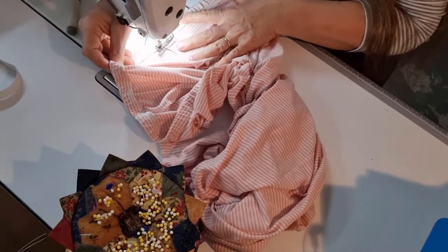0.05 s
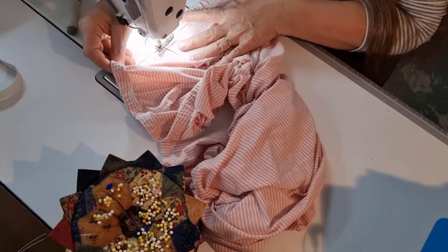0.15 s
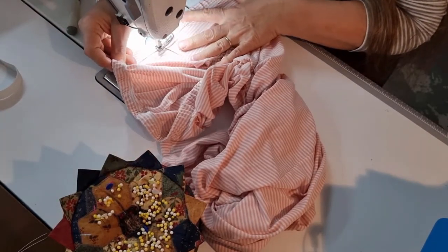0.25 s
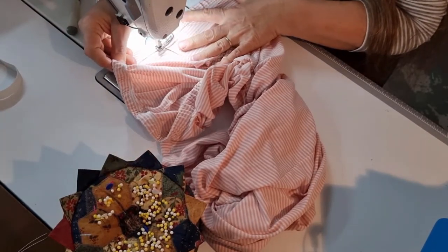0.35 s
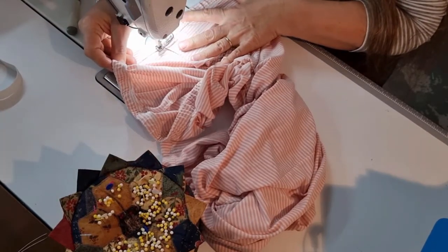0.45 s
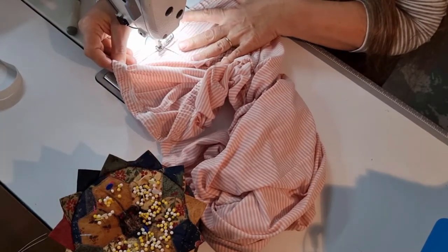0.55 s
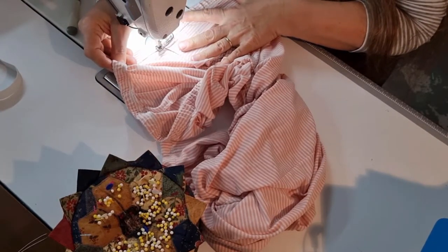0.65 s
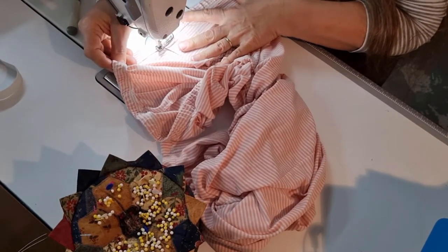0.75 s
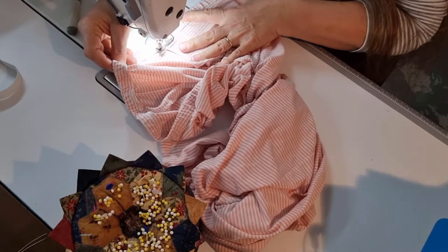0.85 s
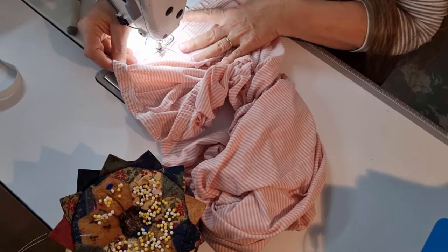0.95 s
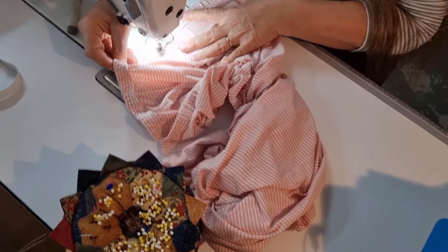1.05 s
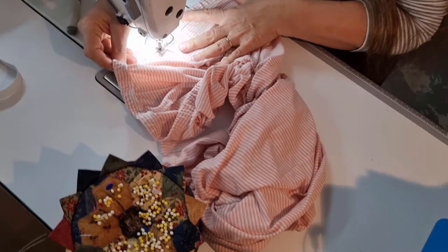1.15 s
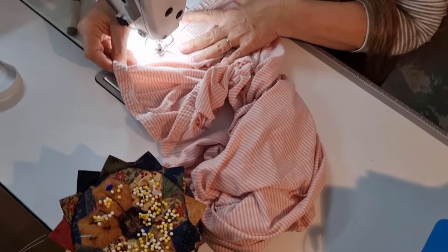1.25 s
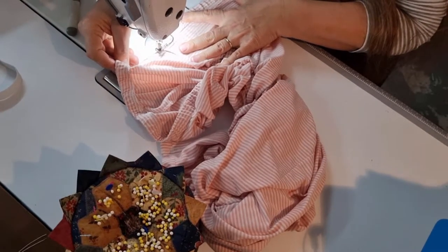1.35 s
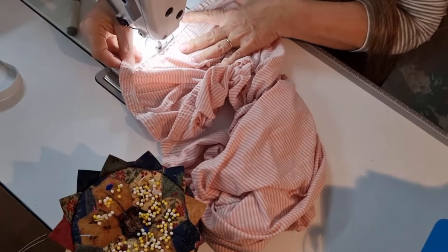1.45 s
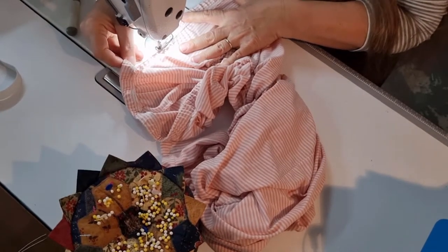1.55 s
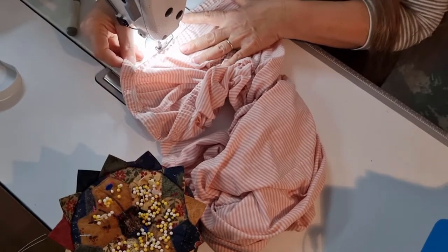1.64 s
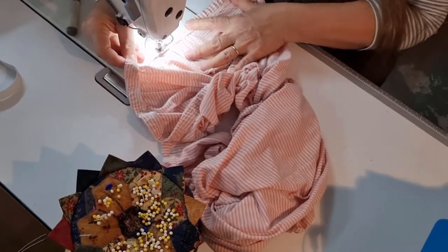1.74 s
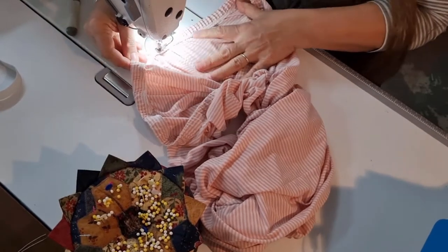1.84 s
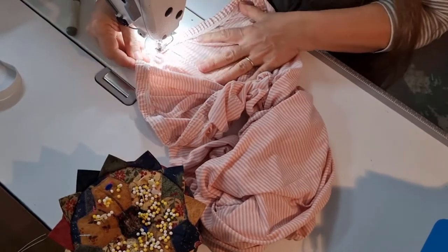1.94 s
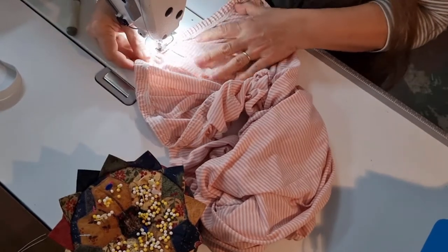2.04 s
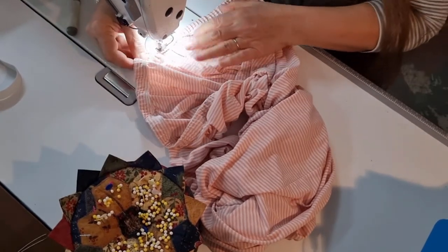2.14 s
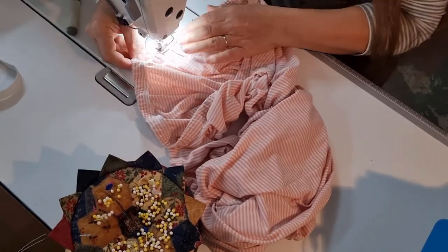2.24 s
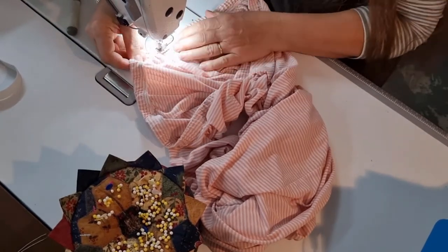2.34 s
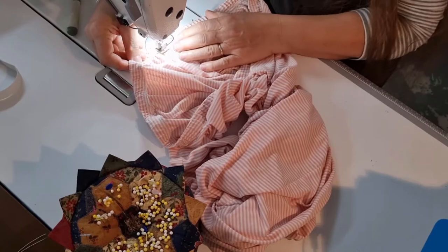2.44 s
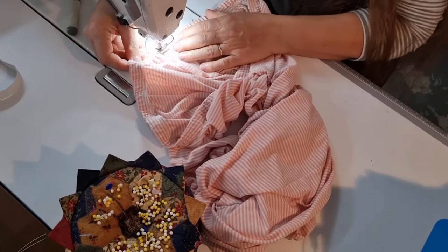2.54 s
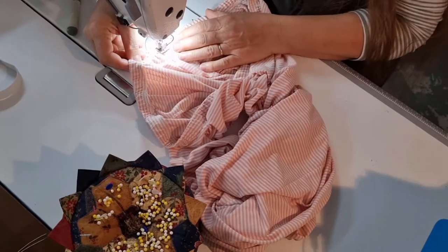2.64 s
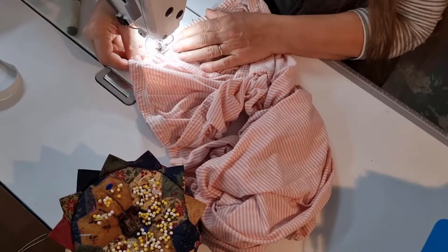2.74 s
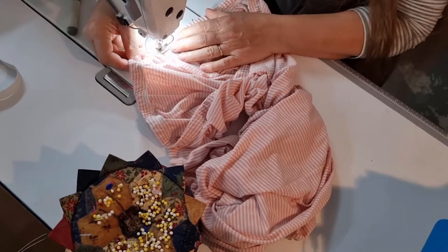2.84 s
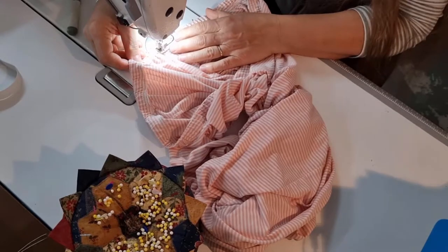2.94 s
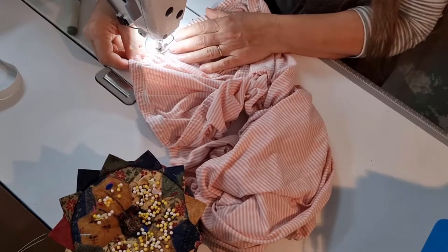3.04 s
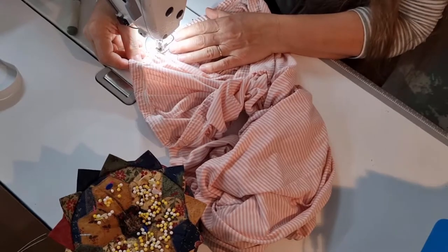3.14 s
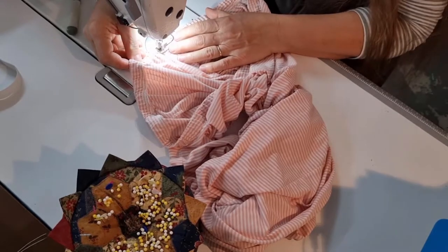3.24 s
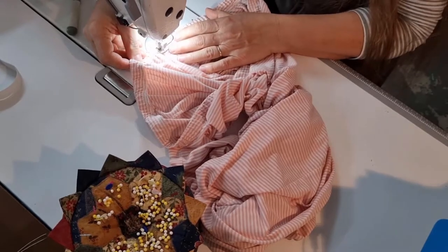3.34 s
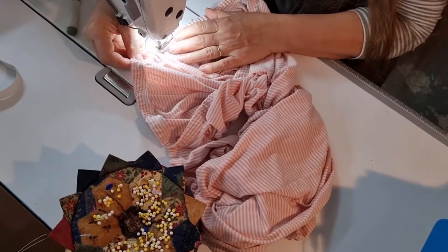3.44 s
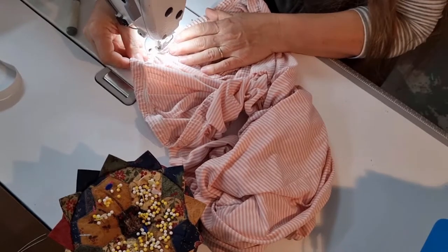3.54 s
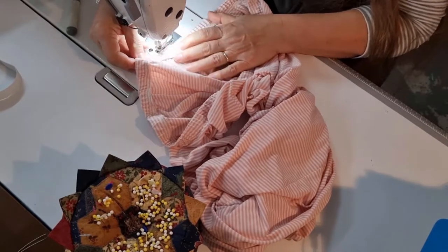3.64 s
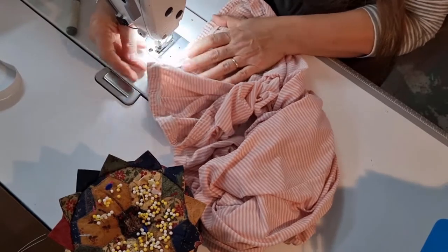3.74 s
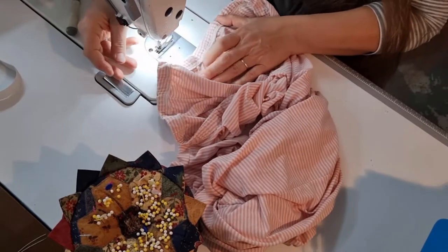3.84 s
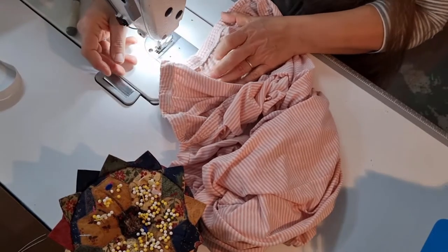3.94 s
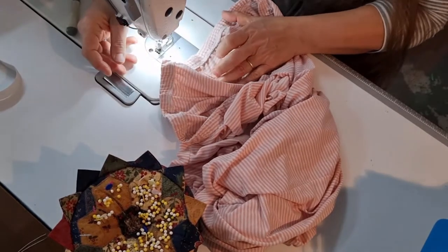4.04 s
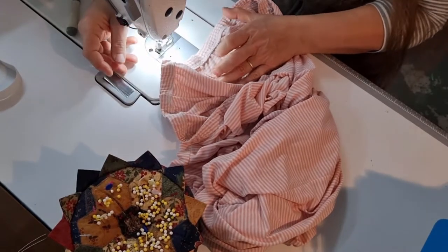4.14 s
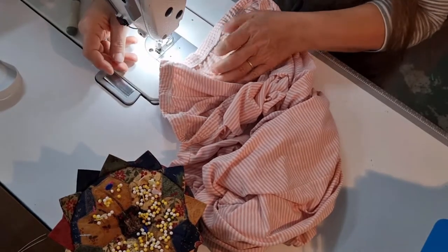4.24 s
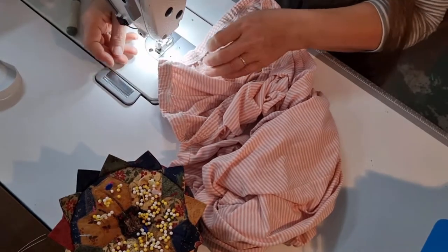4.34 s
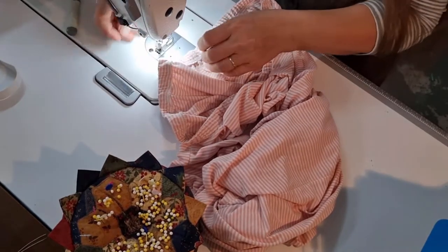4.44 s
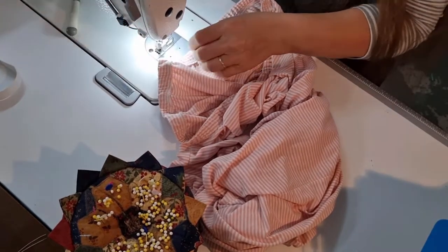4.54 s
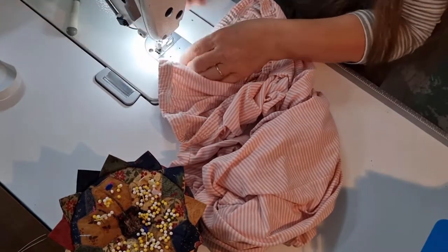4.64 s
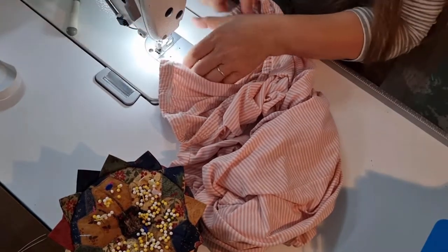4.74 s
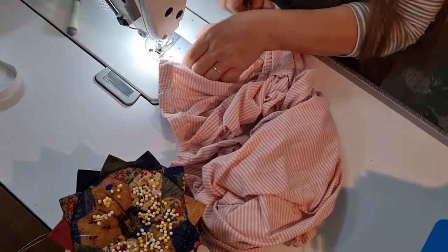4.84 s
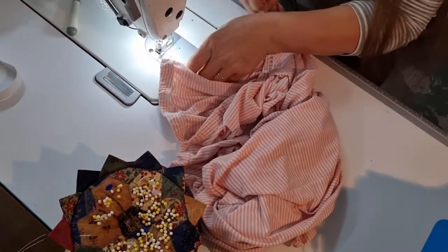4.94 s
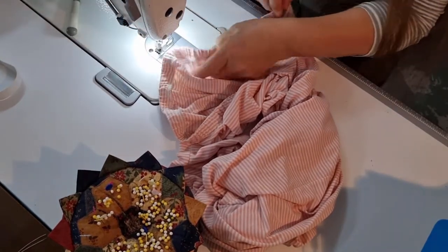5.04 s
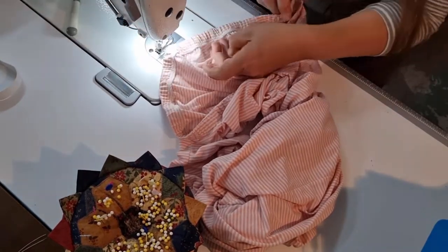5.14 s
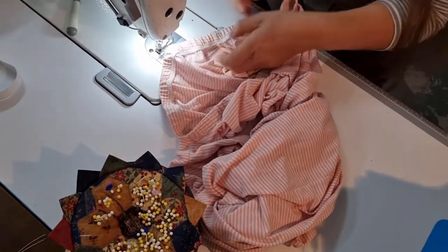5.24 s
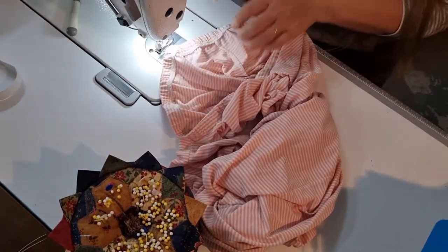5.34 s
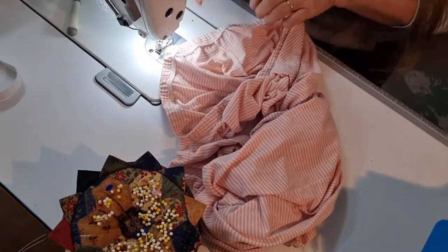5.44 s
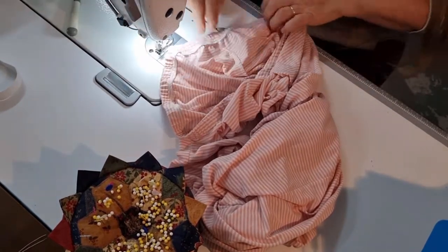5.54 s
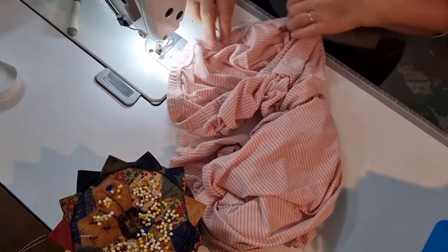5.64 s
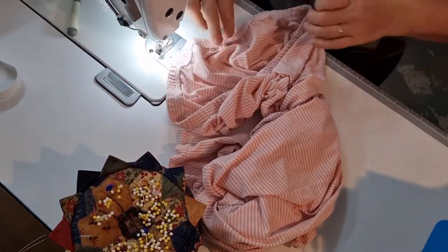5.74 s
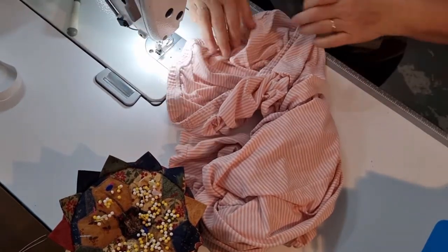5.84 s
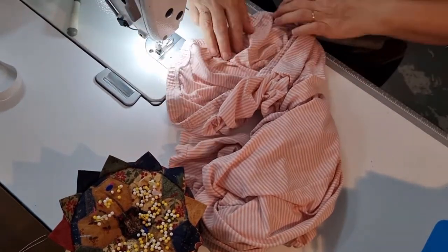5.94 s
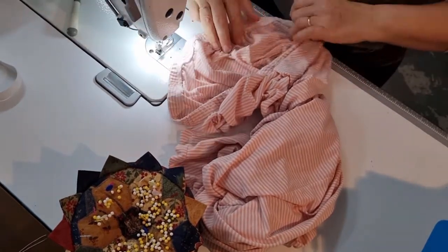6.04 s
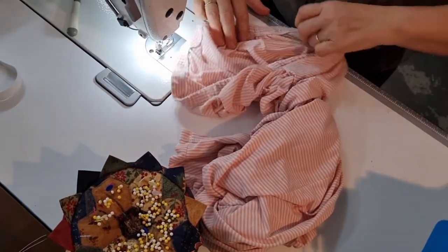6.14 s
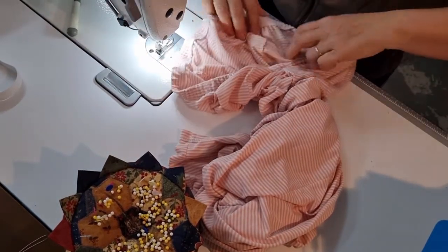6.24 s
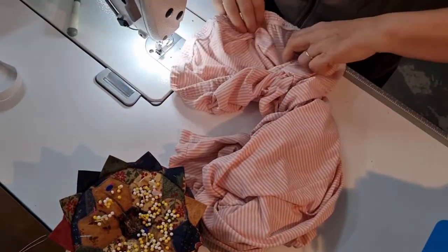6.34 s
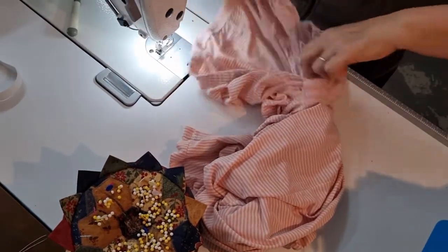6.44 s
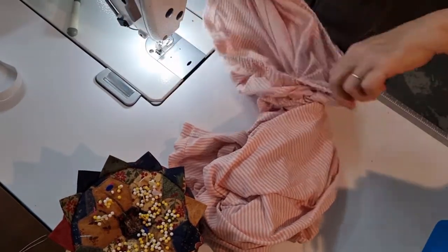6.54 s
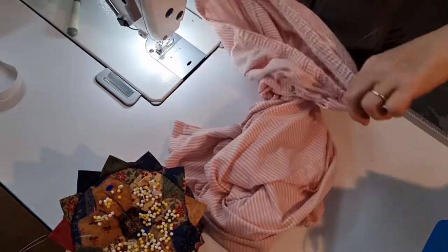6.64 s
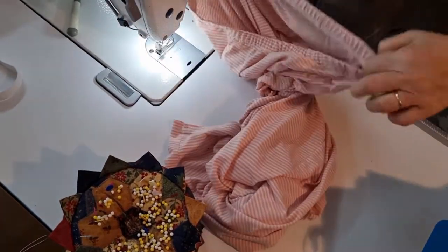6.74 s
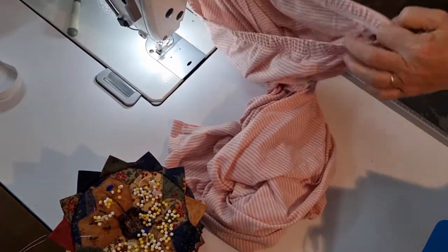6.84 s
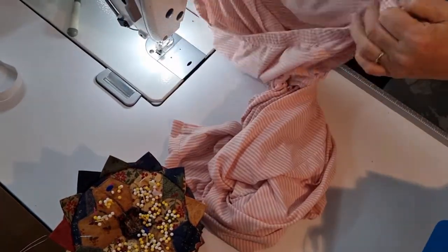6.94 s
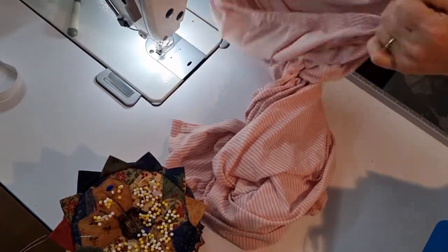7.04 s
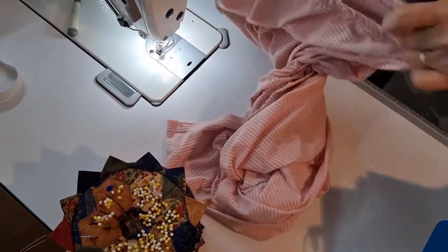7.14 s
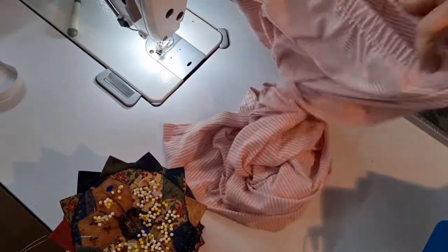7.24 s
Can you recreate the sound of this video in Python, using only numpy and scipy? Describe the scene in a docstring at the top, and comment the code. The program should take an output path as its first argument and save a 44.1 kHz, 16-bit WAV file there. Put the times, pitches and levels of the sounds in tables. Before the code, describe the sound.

Close stereo pickup of an industrial sewing machine, slightly left, in a quiet humming workroom. Light knocks lead into about seven very fast stitches, ended by a hard metallic clack with bright ringing steel and table thump. After a pause comes another sharp snap, then a softer clunk, faint fabric swishes and one tiny click.

```python
"""Industrial sewing machine, close pair

In a workroom humming with far machinery, a machine left of the microphone pair sews a few stitches.
Then its solenoids, trimmer and foot lifter snap. Dense random contacts, coloured by the cast head, make
knocks and running noise; decaying sines make the steel ring; jolts drive resonances of the table top.
Resonated noise bursts make small pitched ticks; filtered noise makes cloth swishes and room air.
"""
import sys
import numpy as np
from scipy import signal
from scipy.io import wavfile

SR = 44100
rng = np.random.default_rng(int(sys.argv[2]) if len(sys.argv) > 2 else 0)


def output_pcm(signal):
    """Save a mono or channel-first signal as 16-bit PCM at the path in sys.argv[1].

    Samples are clipped to [-1, 1] before scaling.
    """
    pcm = np.clip(np.atleast_2d(signal).T, -1, 1) * 32767
    wavfile.write(sys.argv[1], SR, np.round(pcm).astype(np.int16))


N = 321000
T = np.arange(N) / SR   # time [s]

# Room air, a spectrum before scaling: (frequency [Hz], level [dB])
ROOM_TONE = [(15, -43.5), (25, -13), (65, -3), (97, -4.5), (118, -12.5), (368, -15), (457, -22),
             (496, -13.5), (634, -12), (766, -18), (1430, -26.5), (1830, -26.5), (11300, -53), (14800, -47),
             (16500, -59.5)]
# Likeness of the two microphones in diffuse sound: (frequency [Hz], correlation [-1 to 1])
ROOM_LIKENESS = [(60, 0.54), (130, 0.97), (290, 0.22), (640, -0.56), (1410, -0.59), (3100, 0.16),
                 (6820, -0.0), (15000, -0.14)]
# Left over right in diffuse sound: (frequency [Hz], difference [dB])
ROOM_BALANCE = [(60, -3), (130, -1), (290, -2.5), (640, -4.5), (1410, -0.5), (3100, -2.5), (6820, -3),
                (15000, 3.5)]
# Far machine hums, pitches: (frequency [Hz])
HUM_HZ = [362, 511, 625]
# The same hums, before their left and right gains: (width [Hz], level [dB])
HUMS = [(24.98, -69.5), (12.1, -68.5), (7, -68.5)]
# Low rumble that swells and sinks, before its gains: (time [s], level [dB])
RUMBLE = [(0.0, -56), (0.4, -81), (0.65, -76), (1.09, -54), (1.44, -49), (1.88, -61), (2.31, -58.5),
          (2.7, -72), (3.24, -52.5), (3.5, -54), (4.01, -59), (4.24, -56.5), (4.5, -65.5), (4.97, -65.5),
          (5.25, -58), (5.76, -55), (6.14, -67), (7.28, -68)]
# Cloth and hands sliding: (centre [s], half length [s], level [dB])
CLOTH = [(3.737, 0.085, -63.5), (4.431, 0.045, -70), (4.521, 0.064, -73), (4.811, .04, -76),
         (4.918, 0.033, -78.5), (5.04, 0.054, -78.5), (5.61, 0.033, -76.5), (5.98, .07, -82),
         (6.104, 0.04, -81), (6.284, 0.078, -72), (6.43, 0.03, -69.5), (6.5, .02, -76),
         (6.67, 0.037, -78.5), (6.78, .03, -81), (7.02, .03, -79), (7.12, 0.032, -73)]
# Colour of the cloth before scaling: (frequency [Hz], level [dB])
CLOTH_TONE = [(2500, -8.5), (4200, -6.5), (6000, -6), (8500, -2.5), (11000, -6.5), (13500, -1), (16000, -3)]
# Short pings of single parts, peak before the right microphone's mix:
# (time [s], level [dB], pitch [Hz], t60 of the exciting noise [s])
TICKS = [(.85, -44, 2750, .06), (.883, -41, 790, .06), (1.669, -45, 565, .09), (3.948, -41, 565, .1),
         (1.32, -23, 1660, 0.062), (1.320, -28.5, 2400, 0.061), (1.321, -40, 5500, .03),
         (1.452, -28, 769, 0.073), (1.453, -29, 2730, .06), (1.669, -52, 2150, .08),
         (1.824, -37, 780, 0.074), (1.52, -42, 1960, .4), (1.83, -52, 1960, .4), (3.391, -20, 2470, 0.036),
         (3.404, -24.5, 780, 0.055), (3.406, -27, 6000, .03), (3.43, -33.5, 176, 0.29),
         (3.47, -32, 4220, .25), (3.494, -27.5, 4400, 0.065), (6.404, -56, 12000, .02),
         (7.249, -49.5, 1358, .05), (7.25, -58.5, 3790, .04)]
# One small bright click at the table, as for the pings: (pitch [Hz], level [dB], t60 [s])
CLICK = [(2870, -52, .018), (4270, -44.5, .032), (4640, -54, 0.16), (6300, -47, .025), (7860, -47, 0.024),
         (11000, -48, .022), (14500, -51, .03)]
# Modes of table and housing, pitches: (frequency [Hz])
TABLE_HZ = [87, 172, 235, 264, 452, 565, 770]
# The same modes, relative: (level [dB], t60 [s])
TABLE_MODES = [(2, .16), (-11.5, .2), (3, 0.071), (3, .12), (-7, 0.078), (-4, 0.098), (-8, 0.083)]
# Single blows passed into the table top, drive: (time [s], level [dB], extra on the lowest mode [dB])
JOLTS = [(0.848, -32.5, 6.5), (0.878, -33.5, -30), (0.975, -41.5, 4), (1.014, -37.5, 6), (1.263, -31.5, -7),
         (1.325, -28, -8), (1.342, -34, -15), (1.435, -18, 0), (1.456, -20, -3), (1.473, -23.5, 5),
         (1.668, -32.5, 0), (1.698, -36, 10), (1.776, -34, -1), (1.826, -35, 3.5), (2.111, -40, -2),
         (2.128, -33.5, 1), (2.156, -39, 3), (3.071, -43.5, -3), (3.083, -36.5, 4.5), (3.398, -21.5, 3.5),
         (3.428, -33, 11.5), (3.5, -42.5, -4), (3.946, -32, -2.5), (3.975, -31.5, 2), (4.057, -26.5, -3.5),
         (4.081, -31.5, -6), (4.629, -51, 2.5)]
# Modes of the steel, pitches: (frequency [Hz])
STEEL_HZ = [1020, 1950, 4199, 4274, 4850, 5710, 7900, 9198, 10310, 11790, 12475, 13170, 13440, 14870, 15410]
# The same modes, relative and while free: (level [dB], t60 [s])
STEEL_MODES = [(-29, 1), (-27.5, 1.13), (-26, 1), (-28, 1.25), (-30, 0.7), (-25.5, 0.5), (-28, 0.3),
               (-15, .5), (-21.5, 1), (-22, 0.8), (-23.5, 1.53), (-20, .5), (-8, .5), (-23.5, 0.35),
               (0, 1.4)]
# Blows that leave the steel ringing and buzzing until a part comes to rest on it, drive:
# (time [s], ring [dB], buzz [dB], free time [s])
RINGS = [(.84, -48, -85, 0.099), (1.45, -23, -44, 0.1), (1.82, -53, -62, 0.028), (3.405, -30, -47, 0.15),
         (4.06, -48, -68, 0.085)]
# Short-lived resonances of the cast head: (frequency [Hz])
HEAD_HZ = [775, 1174, 1650, 2000, 2450, 2750, 4230, 5750, 9200]
# Direct share of the machine at the right microphone: (frequency [Hz], share [0 to 1])
NEAR_LIKENESS = [(60, .95), (400, .85), (1500, 0.8), (4000, 0), (15000, .2)]
# Zones in which knocks die away separately: (centre [Hz])
ZONE_HZ = [1000, 3300, 7800, 13300]
# Room echo after a knock, one per zone: (t60 [s])
ECHO_T60_S = [.55, .5, 0.2, 0.1]
# Single blows of metal on metal, drive: (time [s], level in the 3.3 kHz zone [dB], tilt [dB per octave])
KNOCKS = [(0.835, -51, -5.5), (0.849, -42, -3), (0.866, -39.5, -4.5), (0.882, -41.5, -4.5),
          (0.972, -42.5, .5), (1.262, -43.5, -3), (1.318, -29, -2.5), (1.342, -35, -5), (1.379, -44, 2),
          (1.407, -36, -2), (1.431, -22, -4.5), (1.45, -17, -4), (1.477, -28, -2.5), (1.665, -58, -7),
          (1.76, -53, -1), (1.774, -52.5, -2), (1.81, -42, -4), (1.823, -39, -5.5), (2.017, -56, -3.5),
          (2.109, -58.5, -6.5), (2.139, -56, -5), (3.056, -55, -7.5), (3.384, -36, -3), (3.391, -28, -3.5),
          (3.404, -16.5, -3.5), (3.432, -33, -1.5), (3.459, -43.5, 2.5), (3.493, -40, 0.5),
          (3.946, -51, -10), (3.965, -54, -11.5), (4.042, -48, -3), (4.052, -33.5, -1.5),
          (4.075, -38, -4.5), (4.382, -58, -6), (4.48, -62, -6)]
# Colour of the knocks: (frequency [Hz], gain [dB])
KNOCK_TONE = [(400, 5.5), (770, 7), (1500, 9), (3300, 8), (6000, 9), (9200, 7.5), (11000, 4), (16000, 13.5)]
# Motor, hook and feed running, drive: (time [s], level [dB])
WHIRR = [(.965, -58), (.98, -45.5), (1.04, -37), (1.09, -36.5), (1.2, -39), (1.25, -41), (1.31, -48.5),
         (1.36, -42.5), (1.43, -46), (1.46, -69)]
# Colour of the running noise, before a common gain: (frequency [Hz], gain [dB])
WHIRR_TONE = [(240, -32), (400, -0.5), (769, -7), (1500, -8), (2840, -9), (11000, -13.5), (13900, -12),
              (15700, -12.5), (16500, -33)]
# Contacts within each stitch: (delay [s], drive over the running level [dB], tilt [dB per octave])
CONTACTS = [(0.0, -15, 9), (.027, -3, -3)]

ROOM_DB, RUMBLE_HZ, CLICK_S = -55, 63.3, 5.784
NEAR_LEFT_DB, RIGHT_LAG_S = 1.5, .0003
SHAKE_T60_S, ECHO_DB = .09, -21.5
# knock drive below SOFT_DB rattles longer and starts more gently
RATTLE_T60_S, CONTACT_T60_S = .075, .03
SOFT_DB, SOFT_S_PER_DB, SOFT_RISE_S_PER_DB = -48, .009, .0002
STITCHES, FIRST_STITCH_S, STITCH_S, STITCH_JITTER_S = 7, 1.018, .0336, .001
CONTACT_SPREAD_DB = 3.0
# the needle's jolt: level over the running drive, extra on the lowest mode, loss per stitch
JOLT_DELAY_S, STITCH_JOLT_DB, STITCH_DEPTH_DB, JOLT_LOSS_DB = .027, 12, 3, .9
STOP_HZ = 16400


def from_db(db):
    """Gain of a dB value."""
    return 10 ** (np.asarray(db) / 20)


def rms_one(x):
    """Scaled to rms 1."""
    return x / np.sqrt(np.mean(x ** 2) + 1e-20)


def in_time(rows, outside=None):
    """A (time, level) curve at every sample."""
    s, level = np.transpose(rows)
    return np.interp(T, s, level, outside, outside)


def at_hz(points, hz):
    """A spectrum read on a log-frequency axis."""
    point_hz, value = np.transpose(points)
    return np.interp(np.log(hz), np.log(point_hz), value)


def drift(rate_hz):
    """Slow random wandering of rms 1: noise through two equal poles at a fortieth of the sample rate."""
    r = np.exp(-80 * np.pi * rate_hz / SR)
    noise = rng.standard_normal(N // 40 + 2002)
    slow = signal.lfilter([1], [1, -2 * r, r * r], noise)[2000:]   # settled part
    return np.interp(np.arange(N) / 40, np.arange(len(slow)), rms_one(slow))


def ring(x, hz, t60):
    """A resonance: a unit click sets a dying sine of height 1 ringing."""
    r, w = from_db(-60 / (t60 * SR)), 2 * np.pi * hz / SR
    return signal.lfilter([0, np.sin(w)], [1, -2 * r * np.cos(w), r * r], x + 1e-18)


def bands(low_hz, high_hz):
    """Third-octave band-passes as (centre Hz, filter)."""
    count = round(3 * np.log2(high_hz / low_hz))
    edges = np.geomspace(low_hz, high_hz, count + 1)
    return [(np.sqrt(a * b), signal.butter(2, [a, b], "band", fs=SR, output="sos"))
            for a, b in zip(edges, edges[1:])]


def dying(times, level_db, t60, rise_s):
    """Envelope of blows that rise quickly and die away; powers add."""
    power = np.zeros(N)
    for s, db, decay, rise in zip(times, level_db, np.clip(t60, .01, 1), rise_s + 0 * times):
        i = round(s * SR)
        t = T[:min(N - i, int(1.2 * decay * SR))]
        power[i:i + len(t)] += (from_db(db - 60 * t / decay) * (1 - np.exp(-t / rise))) ** 2
    return np.sqrt(power)


def held(at, free_s, damped_t60):
    """Swells after a blow, stays while the part is free, then is damped."""
    t = np.maximum(T - at, 0)
    return (1 - np.exp(-t / 0.0089)) * from_db(-60 * np.maximum(t - free_s, 0) / damped_t60)


def rattle(per_s, spread_db):
    """Two unrelated streams of dense uneven contacts; rms 1."""
    sizes = from_db(spread_db * np.minimum(rng.exponential(1, (2, N)), 4))
    signs = rng.choice([-1, 1], (2, N))
    return rms_one(sizes * signs * (rng.random((2, N)) < per_s / SR))


def near(direct, scattered, share):
    """A source at the left reaches the right microphone later and mixed with scattered sound."""
    late = np.interp(T - RIGHT_LAG_S, T, direct)
    share = np.clip(share, 0, 1)
    right = share * late + np.sqrt(1 - share ** 2) * scattered
    return np.array([direct, right]) * from_db([[NEAR_LEFT_DB / 2], [-NEAR_LEFT_DB / 2]])


def spread_noise(spectrum, low_hz, patchy_db):
    """Diffuse stereo noise, each band with its own level, flicker, likeness and balance; rms 1."""
    out, white = 0, rng.standard_normal((2, 2, N))
    for k, (hz, sos) in enumerate(bands(low_hz, 17000)):
        mid, side = signal.sosfilt(sos, white[k % 2])   # neighbouring bands get unrelated noise
        alike = np.clip(at_hz(ROOM_LIKENESS, hz), -1, 1)
        left_db = at_hz(ROOM_BALANCE, hz)
        balance_db = np.array([[left_db / 2], [-left_db / 2]])
        gain = from_db(at_hz(spectrum, hz) + patchy_db * drift(6) + balance_db)
        out = out + gain * (np.sqrt(1 + alike) * mid + np.sqrt(1 - alike) * side * [[1], [-1]])
    return rms_one(out)


def workroom():
    """Broad room noise, narrow far hums from resonated noise, and a low rumble that swells and sinks."""
    hums = 0
    for hz, (width_hz, db) in zip(HUM_HZ, HUMS):
        t60 = np.log(1000) / (np.pi * width_hz)
        hums = hums + from_db(db) * rms_one(ring(rng.standard_normal(N), hz, t60))
    # narrow noise: two slow drifts on sine and cosine
    turn = 2 * np.pi * RUMBLE_HZ * T
    wander = drift(9.0) * np.sin(turn) + drift(5.8) * np.cos(turn)
    rumble = from_db(in_time(RUMBLE)) * wander
    air = from_db(ROOM_DB) * spread_noise(ROOM_TONE, 22, patchy_db=0.18)
    return air + hums * [[.4], [1.3]] + rumble * [[.87], [1.15]]


def cloth():
    """Soft bright swishes of fabric under the hands: noise under bell-shaped swells whose powers add."""
    power = sum(from_db(2 * db) * np.exp(-((T - s) / half_s) ** 2) for s, half_s, db in CLOTH)
    return np.sqrt(power) * spread_noise(CLOTH_TONE, 3000, patchy_db=1.0)


def ticks():
    """A dying chatter through one resonance each, so the pitch is heard but rough."""
    out, length = np.zeros((2, N)), SR // 3
    pings = [*TICKS, *[(CLICK_S, db, hz, t60) for hz, db, t60 in CLICK]]
    for s, db, hz, t60 in pings:
        i = round(s * SR)
        chatter = rng.standard_normal((2, length)) * from_db(-60 * T[:length] / t60)
        voiced = ring(chatter, hz, min(35.0 / hz, .06))
        out[:, i:i + length] += (from_db(db) * voiced / np.abs(voiced).max())[:, :N - i]
    return np.array([out[0], 0.98 * out[0] + 1.2 * out[1]])


def table_top(jolts):
    """Jolts shake the low modes of table and housing; the deepest mode has a strength of its own."""
    s, level_db, depth_db = np.transpose(jolts)
    shake = 0.2 * rng.standard_normal((2, N))
    shake[0, (s * SR).astype(int)[:, None] + np.arange(40, 80)] += .7   # the firm first push
    out = 0
    for hz, (db, decay) in zip(TABLE_HZ, TABLE_MODES):
        mode_db = level_db + depth_db * (hz < 100)
        drive = dying(s, mode_db, 0 * s + SHAKE_T60_S, 0.0021) * shake
        # keep each mode's sound free of rumble below its pitch
        low_cut = signal.butter(2, 0.76 * hz, "high", fs=SR, output="sos")
        out = out + from_db(db - 25.5) * signal.sosfilt(low_cut, ring(drive, hz, decay))
    return near(*out, 0.99)


def steel():
    """Every blow strikes each steel mode with a strength of its own; the treble modes are damped soonest."""
    out = np.zeros((2, N))
    for at, ring_db, buzz_db, free_s in RINGS:
        i = round(at * SR)
        t = T[:min(N - i, SR // 2)]
        for hz, (db, t60) in zip(STEEL_HZ, STEEL_MODES):
            # level sways as close pairs of modes beat, the weaker ones more deeply
            beat_db = 2.5 + 2.5 * (db < -5)
            beat = np.sin(2 * np.pi * (rng.uniform(14, 36) * t + rng.random()))
            sway = rng.normal(0, 2.0) + beat_db * beat
            damped = held(0, free_s, 0.087 + 0.39 * (1 - hz / 16000))[:len(t)]
            right_turn = np.array([[0], [rng.normal(0, .12)]])   # right microphone's phase, in turns
            phase = 2 * np.pi * (hz * t + rng.random() + right_turn)
            level = from_db(ring_db + db + sway - 60 * t / t60)
            out[:, i:i + len(t)] += level * damped * np.sin(phase)
    return out * from_db([[1.5], [-1.5]])


def cast_head(x):
    """The cast head adds its short-lived resonances to every rattle."""
    peaks = 0
    for hz in HEAD_HZ:
        r = np.exp(-np.pi * (40 + 0.012 * hz) / SR)   # width grows with pitch
        poles = [1, -2 * r * np.cos(2 * np.pi * hz / SR), r * r]
        peaks = peaks + signal.lfilter([(1 - r * r) / 2, 0, (r * r - 1) / 2], poles, x)
    return from_db(-2.0) * (x + 0.95 * peaks)


def knock_levels(knocks, hard_t60):
    """Envelope per zone: a first crack, the rattle, a longer echo from the room, and the buzz."""
    s, level_db, tilt_db = np.transpose(knocks)
    soft_db = np.maximum(SOFT_DB - level_db, 0)
    t60, rise = hard_t60 + SOFT_S_PER_DB * soft_db, SOFT_RISE_S_PER_DB * soft_db
    buzz = sum(from_db(buzz_db) * held(at, free_s, 0.17) for at, ring_db, buzz_db, free_s in RINGS)
    levels = []
    for hz, echo_s in zip(ZONE_HZ, ECHO_T60_S):
        db = level_db + tilt_db * np.log2(hz / ZONE_HZ[1])
        crack = dying(s, db + 2.0, 0 * t60 + 0.013, 0.0007 + rise)
        body = dying(s, db, t60, 0.002 + rise)
        echo = dying(s, db + ECHO_DB, 0 * t60 + echo_s, .006)
        levels.append(crack + body + echo + buzz + 1e-9)
    return levels


def machine(knocks, hard_t60):
    """Knocks and running noise: contact rattle in bands, coloured by the head, with the ringing steel."""
    hits = knock_levels(knocks, hard_t60)
    whirr = from_db(in_time(WHIRR, -120))
    # neighbouring bands get unrelated contacts
    contacts = [rattle(9000, spread_db=1.5) for pair in range(2)]
    running = [rattle(1800, spread_db=3.0) for pair in range(2)]
    out = 0
    for k, (hz, sos) in enumerate(bands(400, 17000)):
        place = np.interp(np.log(hz), np.log(ZONE_HZ), np.arange(len(hits)))
        zone = min(int(place), len(hits) - 2)
        level = hits[zone] * (hits[zone + 1] / hits[zone]) ** (place - zone)   # dB glide between zones
        drive = from_db(at_hz(KNOCK_TONE, hz)) * level * contacts[k % 2]
        drive += from_db(at_hz(WHIRR_TONE, hz) + 12.5) * whirr * running[k % 2]
        out = out + near(*signal.sosfilt(sos, drive), at_hz(NEAR_LIKENESS, hz))
    return cast_head(out) + steel()


def stitches():
    """Knock and jolt rows of all stitches: nearly even steps, strength following the running level."""
    count, chance = np.arange(STITCHES), rng.standard_normal((STITCHES, 2 + len(CONTACTS)))
    s = FIRST_STITCH_S + STITCH_S * count + STITCH_JITTER_S * chance[:, 0]
    running_db = np.interp(s + JOLT_DELAY_S, *np.transpose(WHIRR))
    knocks = []
    for k, (delay, db, tilt_db) in enumerate(CONTACTS):
        knock_db = running_db + db + CONTACT_SPREAD_DB * chance[:, 2 + k]
        knocks.append(np.transpose([s + delay, knock_db, 0 * s + tilt_db]))
    jolt_db = running_db + STITCH_JOLT_DB - JOLT_LOSS_DB * count + chance[:, 1]
    return np.vstack(knocks), np.transpose([s + JOLT_DELAY_S, jolt_db, 0 * s + STITCH_DEPTH_DB])


def scene():
    """All sources at the two microphones."""
    knocks, jolts = stitches()
    t60 = np.repeat([RATTLE_T60_S, CONTACT_T60_S], [len(KNOCKS), len(knocks)])
    background = workroom() + cloth()
    table = ticks() + table_top(np.vstack([JOLTS, jolts]))
    return background + table + machine(np.vstack([KNOCKS, knocks]), t60)


def record(dry):
    """The top is cut steeply, 70 dB down from the stop frequency upward."""
    return signal.sosfilt(signal.cheby2(14, 70, STOP_HZ, fs=SR, output="sos"), dry)


dry = scene()
out = record(dry)
output_pcm(out)
```